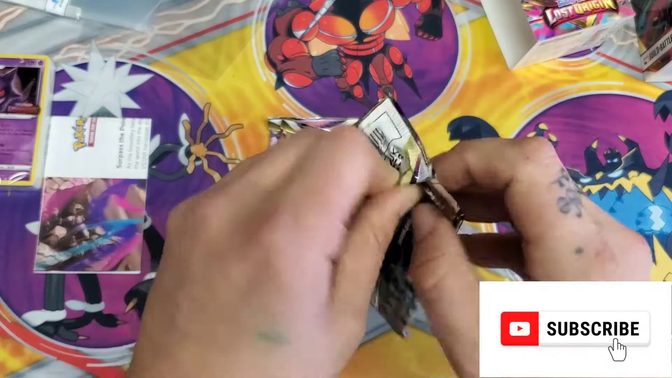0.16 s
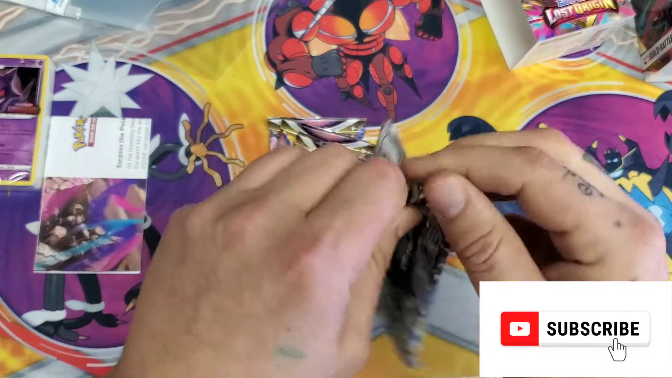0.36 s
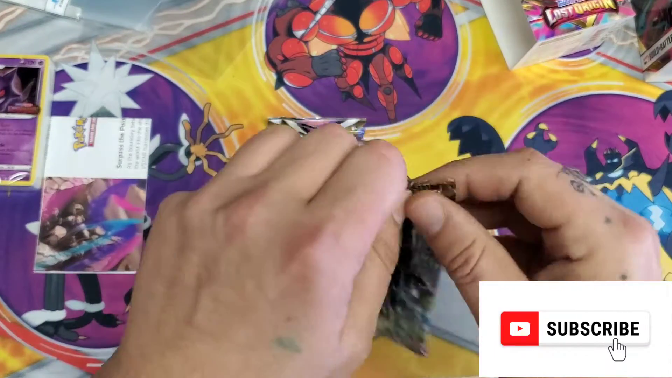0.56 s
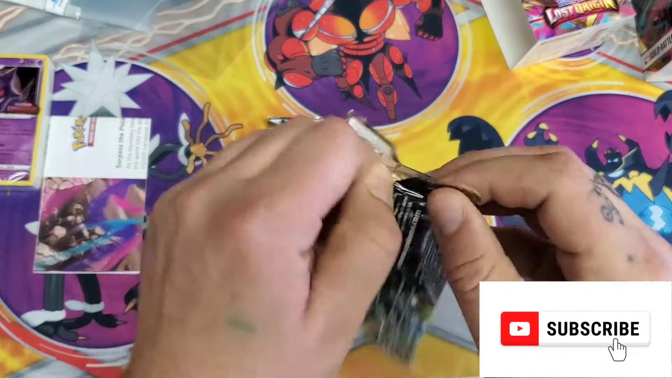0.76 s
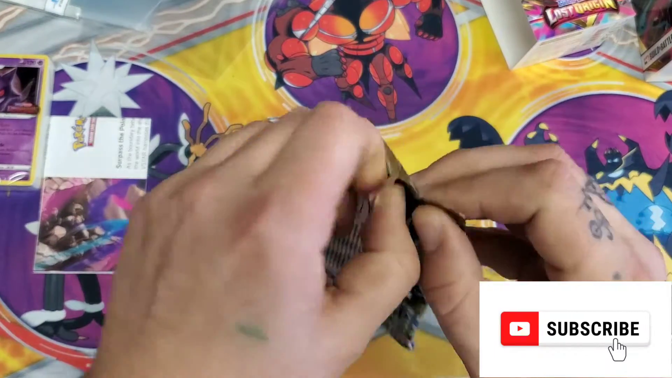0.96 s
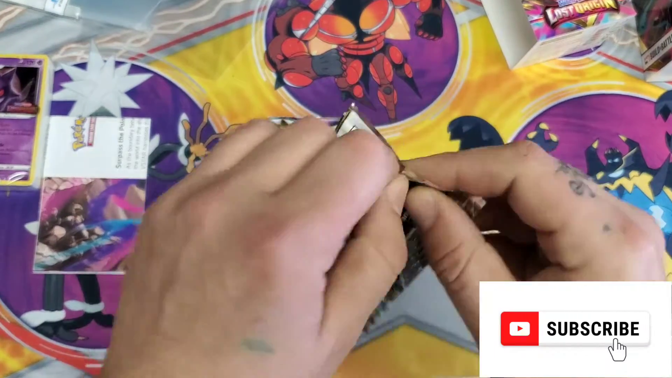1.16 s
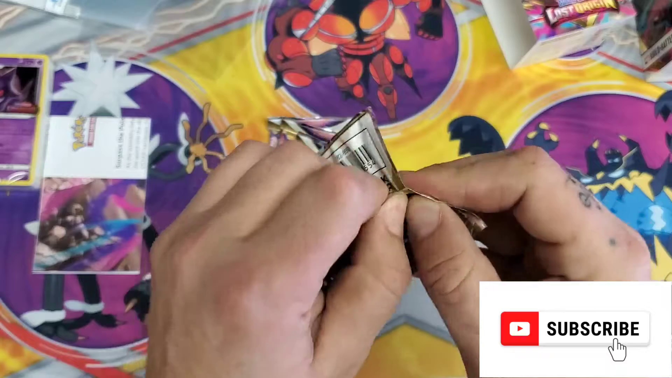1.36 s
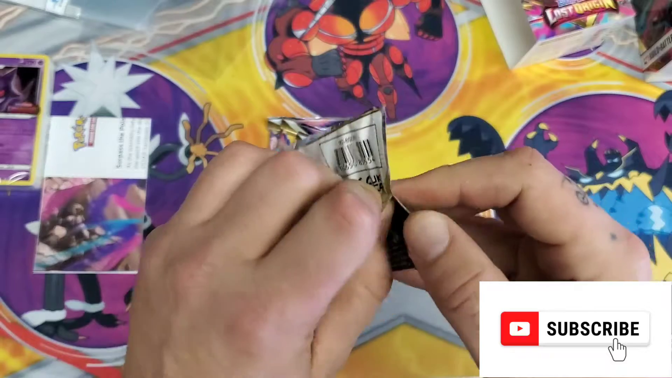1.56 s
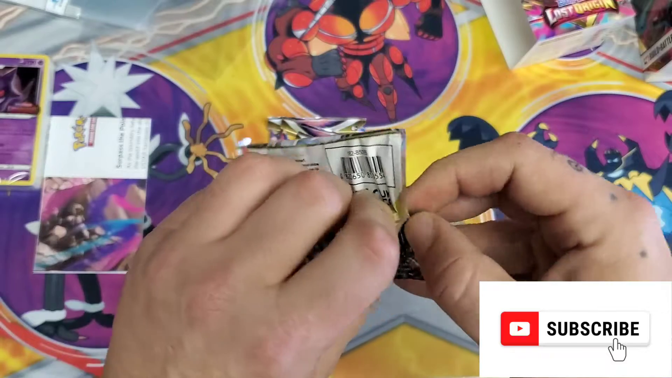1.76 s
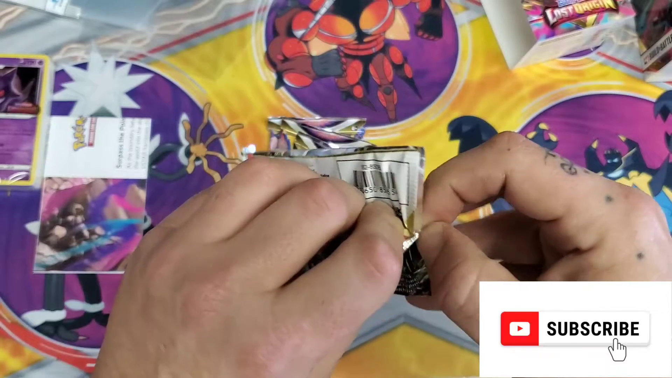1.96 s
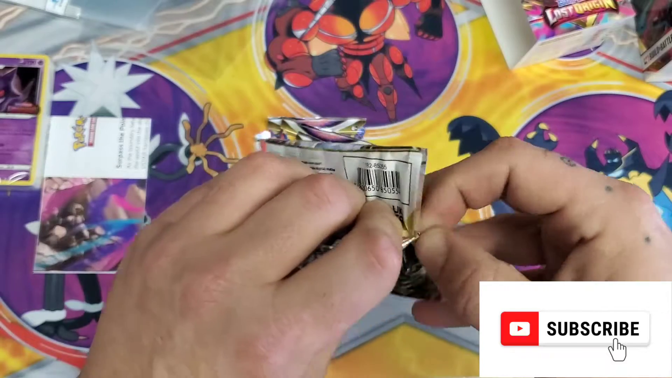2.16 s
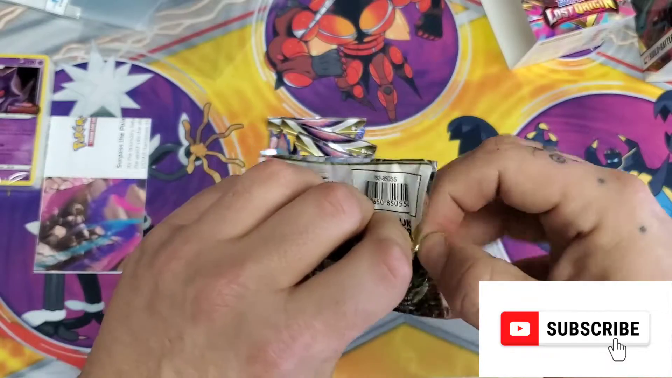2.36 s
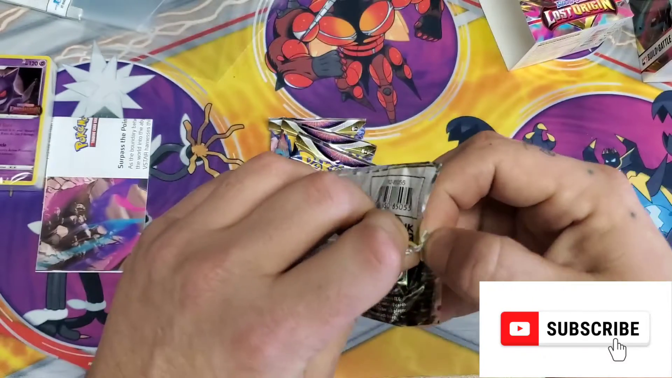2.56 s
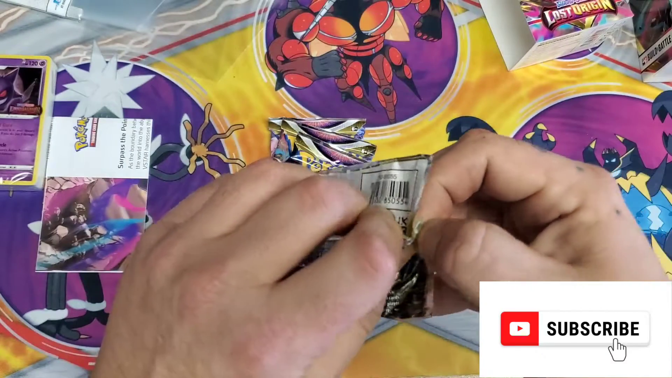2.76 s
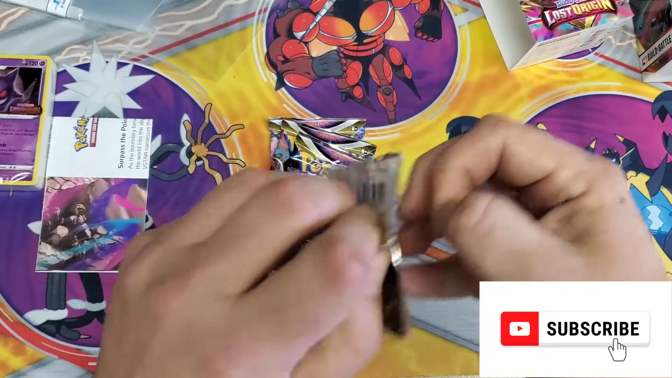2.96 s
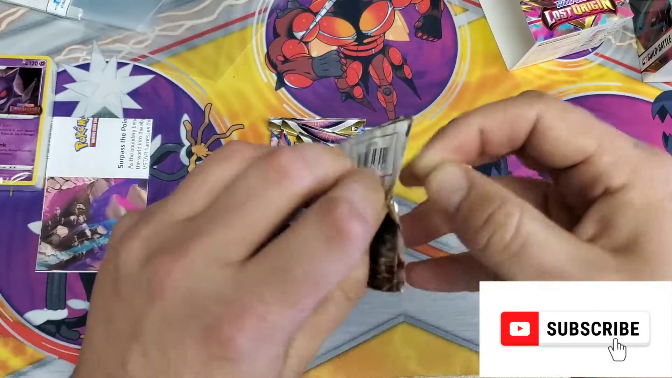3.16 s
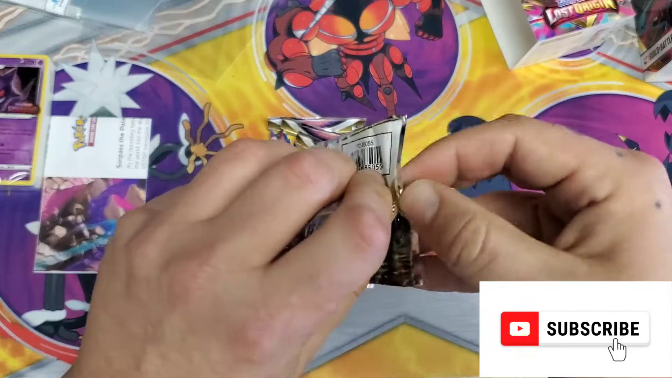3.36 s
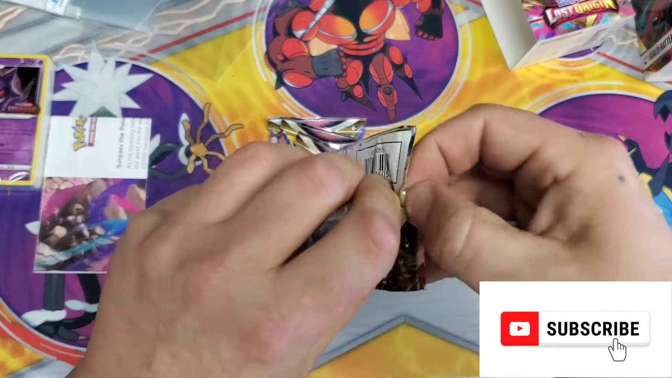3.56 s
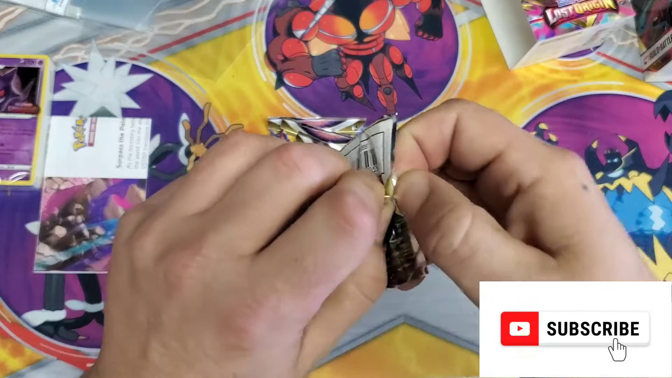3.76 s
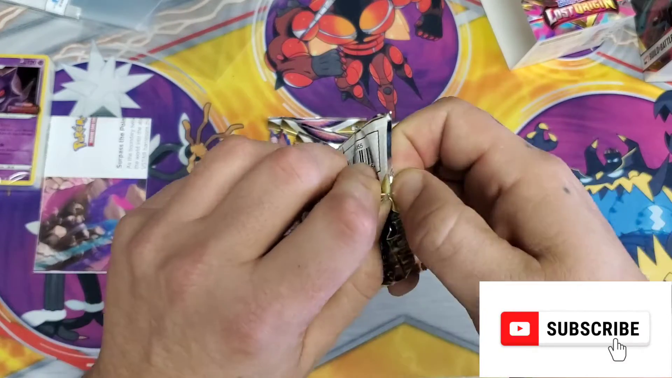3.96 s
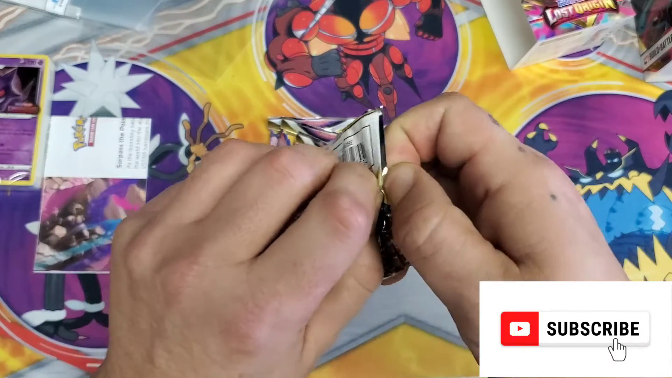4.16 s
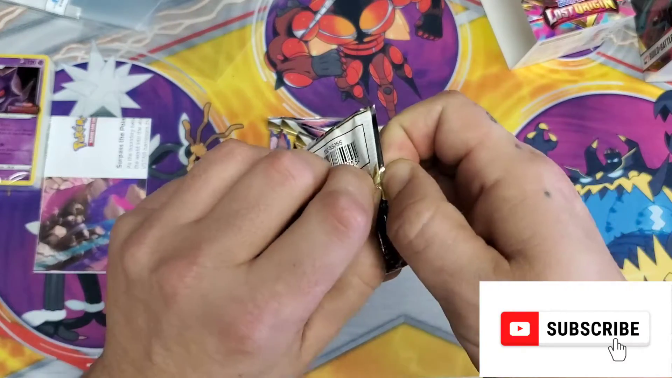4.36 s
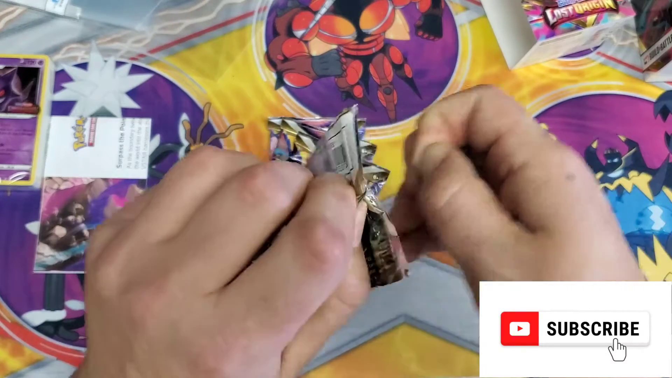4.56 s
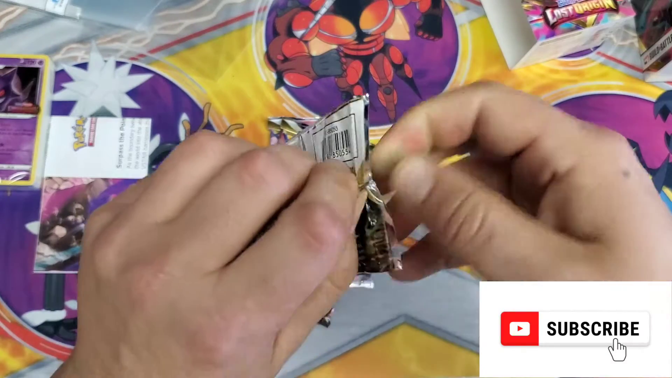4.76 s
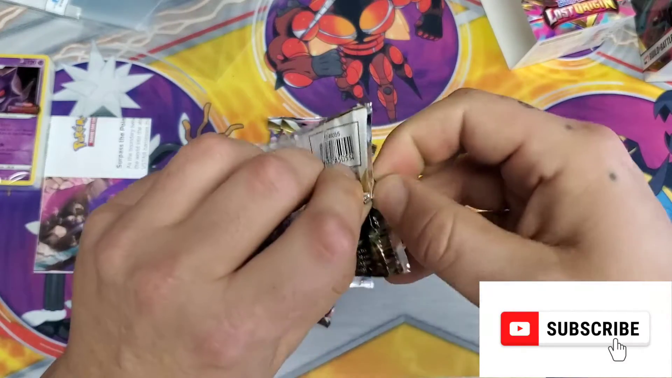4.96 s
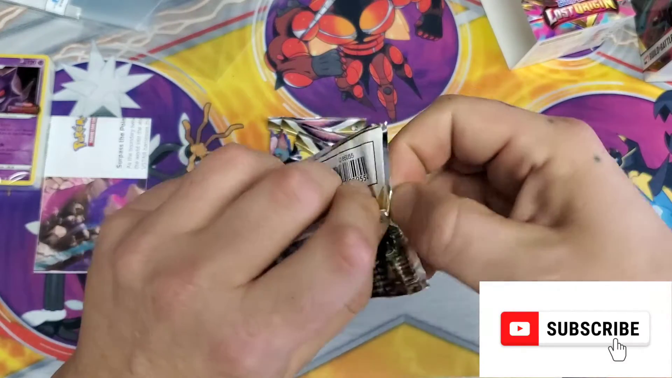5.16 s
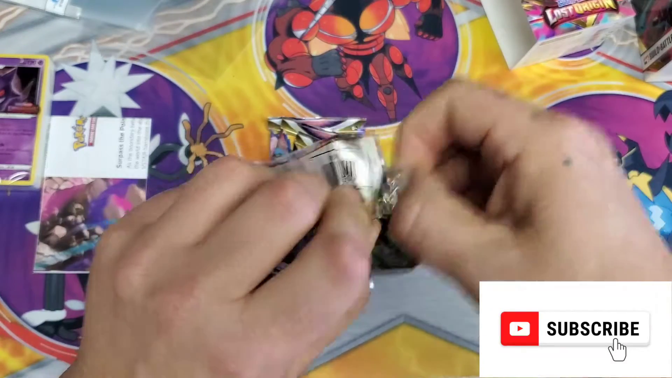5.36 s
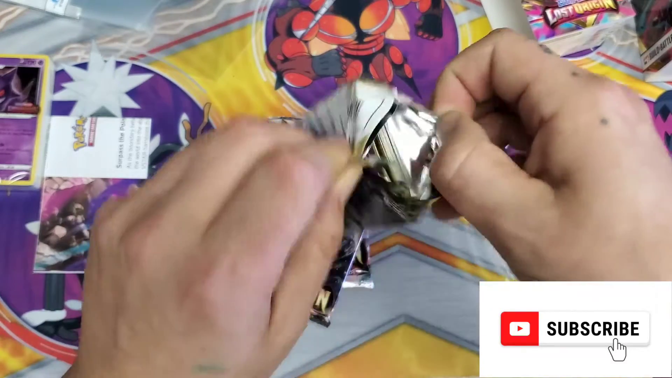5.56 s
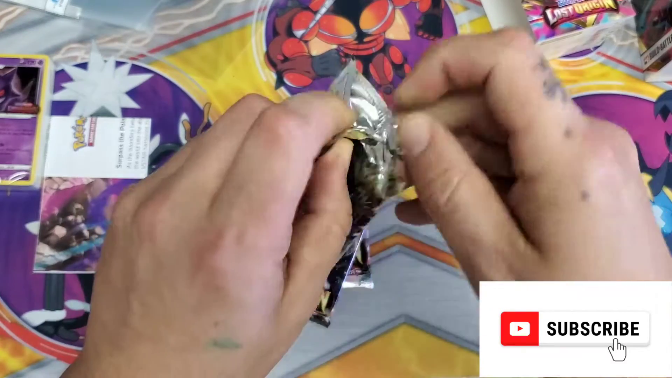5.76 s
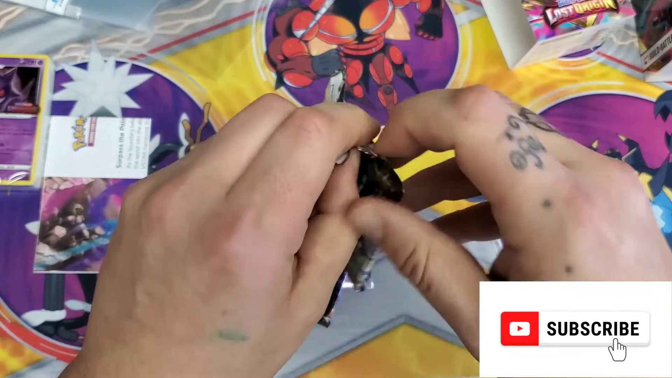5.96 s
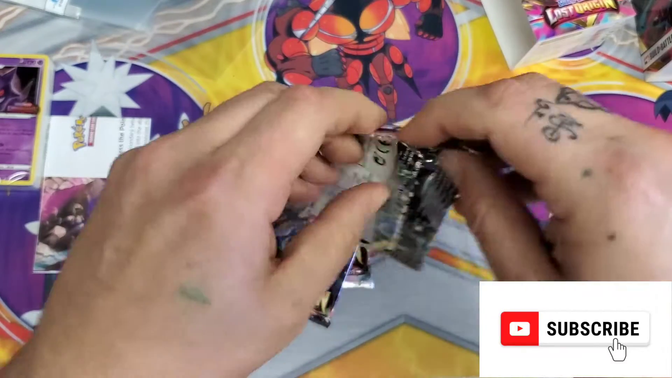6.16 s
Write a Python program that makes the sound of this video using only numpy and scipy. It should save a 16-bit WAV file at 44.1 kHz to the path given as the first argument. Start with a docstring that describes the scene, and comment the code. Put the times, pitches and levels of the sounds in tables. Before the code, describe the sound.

A small foil wrapper crinkles and snaps sharply under busy fingers, easing to sparse ticks before a loud tearing burst near the end.

```python
"""Two hands work a small foil wrapper close to a pair of microphones in a small damped room.
Throughout, a distant induction motor hums (beating sine lines) over rumble and air (filtered noise).
From the start the foil crinkles (random ticks); knocks (two decaying tones), snaps (ring, crack and push)
and running creases or seam tears (dense ticks) soon join, and a hand bumps the table (soft noise thuds).
The foil is busiest in the first second and a half, sparser after that, and bursts out again near 5.4 s."""
import sys
import numpy as np
from scipy import signal
from scipy.fft import rfft, irfft, next_fast_len
from scipy.io import wavfile
from scipy.ndimage import uniform_filter1d, minimum_filter1d

SR = 44100
rng = np.random.default_rng(int(sys.argv[2]) if len(sys.argv) > 2 else 0)


def dump_mix(stems):
    """Bounce the given channels to the path in sys.argv[1] as a 16-bit WAV at rate SR."""
    frames = np.atleast_2d(stems).T  # one column per channel
    limited = np.clip(frames, -1, 1)  # hard clip at full scale
    pcm = np.round(limited * 32767).astype(np.int16)
    wavfile.write(sys.argv[1], SR, pcm)


def gain_from_db(level_db):
    """Convert decibel levels to linear amplitude factors (20 dB per decade)."""
    decades = np.asarray(level_db, float) / 20
    return 10 ** decades


N = 273881
LEFT_RIGHT = np.array([[1], [-1]])   # opposite signs in the two channels


def in_time(rows):
    """Linear interpolation: a (time, value) curve becomes one value per sample."""
    s, values = np.transpose(rows)
    return np.interp(np.arange(N) / SR, s, values)


def at_hz(points, hz):
    """Logarithmic frequency scale: read a (frequency, dB) table between its points."""
    table_hz, db = np.transpose(points)
    return np.interp(np.log(hz + 1), np.log(table_hz), db)


def rms_one(x):
    """Normalisation of power: scale to rms 1."""
    return x / np.sqrt(np.mean(x ** 2) + 1e-20)


def band(x, low_hz, high_hz):
    """Band limitation by a Butterworth band-pass."""
    sos = signal.butter(2, [low_hz, min(high_hz, .45 * SR)], "band", fs=SR, output="sos")
    return signal.sosfilt(sos, x + 1e-18)


def shaped(x, gain):
    """Linear filtering: multiply the spectrum by gain(Hz)."""
    size = next_fast_len(N)
    hz = np.arange(size // 2 + 1) * SR / size
    return irfft(rfft(x, size) * gain(hz), size)[..., :N]


def add(out, s, sound):
    """Superposition: mix a short sound in at time s."""
    i = round(s * SR)
    out[i:i + len(sound)] += sound[:N - i]


# motor lines: mains_multiple, shaft_multiple, level_db (before the common gain), phase_offset_rad (+ left, - right)
HUM_LINES = [(2, 0, -57.5, .05), (4, 0, -62.5, 0.53), (6, 0, -69.5, .15), (8, 0, -77.5, 0.16),
             (0, 2, -64, 0.064), (0, 3, -99.5, .15), (0, 5, -69, 0.28), (0, 16, -77.5, .2),
             (2, 1, -68.5, 0.13), (4, 1, -79, 0.33)]
# spectrum of the room air: frequency_hz, relative_density_db (dB per Hz)
AIR_SPECTRUM = [(15, -29.5), (25, 6), (123, -4), (256, -6.5), (384, -9), (560, -18), (936, -15),
                (1040, -27), (1370, -25), (1700, -20.5), (2840, -45), (5430, -31.5), (7510, -56),
                (14400, -30), (16000, -43)]
# arms shifting on the table top, as low rumble: time_s, level_db
ARM_RUMBLE = [(0.0, -67), (0.67, -52.5), (0.71, -68), (3.11, -56.5), (5.29, -66), (5.38, -58.5),
              (6.21, -62.5)]


def background():
    """Interference: motor lines locked to mains and shaft beat together, over rumble and partly alike air."""
    mains_hz, shaft_hz, in_step_s = 60.01, 58.57, .07
    gain_db, sag_db_per_s, waver_db = 5, 0.69, 2   # common to hum and air, which slowly fade and waver
    air_db = -63   # before the common gain
    t = np.arange(N) / SR - in_step_s
    waver = np.interp(t, np.arange(50) * 0.076, rng.standard_normal(50))   # holds still after 3.8 s
    common_db = gain_db - sag_db_per_s * t + waver_db * waver

    hum = np.zeros((2, N))
    for mains, shaft, db, offset in HUM_LINES:
        line_hz = mains * mains_hz + shaft * shaft_hz
        # standing waves reach the two ports out of step
        phase = shaft * (shaft - 2) + offset * LEFT_RIGHT
        hum += gain_from_db(db - 2) * np.cos(2 * np.pi * line_hz * t + phase)

    mid, side, low = rng.standard_normal((3, N))
    unlike = band(side, 300, 18000) * 0.77 + 0.11 * side
    air = rms_one(shaped(mid + unlike * LEFT_RIGHT, lambda hz: gain_from_db(at_hz(AIR_SPECTRUM, hz))))
    low_mid = band(band(low, 30, 85), 40, 90)
    low_side = 0.31 * band(side, 30, 85)
    rumble = rms_one(low_mid + low_side * LEFT_RIGHT)
    return gain_from_db(common_db) * (hum + gain_from_db(air_db) * air) + gain_from_db(in_time(ARM_RUMBLE)) * rumble


# colour of the crinkle: frequency_hz, relative_density_db (dB per Hz)
FOIL_COLOUR = [(180, -47), (300, -17), (392, -8.5), (470, -12), (634, -35.5), (762, -15), (856, -13),
               (4750, -1), (7570, -5.5), (14500, 3.5), (16000, 19.5)]


def grains(per_s, spread_db, dull_db):
    """Shot noise: tiny random buckles, each a broad tick at its own pitch; dullness lifts the low pitches."""
    sizes = gain_from_db(spread_db * np.minimum(rng.exponential(1, N), 3)) * rng.choice([-1, 1], N)
    clicks = sizes * (rng.random(N) < per_s / SR)
    dealt = rng.integers(0, 10, N)   # which of ten pitches each click takes
    out = 0
    for k, hz in enumerate(np.geomspace(500, 15000, 10)):
        lift_db = dull_db * np.log2(5000 / hz)
        ticks = rms_one(band(clicks * (dealt == k), hz / 1.234, hz * 1.533))
        # the root of the pitch turns level per Hz into level per band
        out = out + gain_from_db(at_hz(FOIL_COLOUR, hz) + lift_db) * ticks * np.sqrt(hz)
    return rms_one(band(out, 320, SR / 2))   # small facets radiate no bass


# how hard the fingers work the foil: time_s, level_db (of the fine crinkle)
FINGER_EFFORT = [(0.0, -55), (0.14, -52), (0.26, -35), (0.53, -51.5), (0.85, -45.5), (1.24, -41.5),
                 (1.4, -57.5), (1.64, -52), (1.8, -59.5), (2.25, -62), (2.4, -57), (2.63, -62), (3.18, -57),
                 (4.08, -73.5), (5.14, -73.5), (5.55, -46.5), (5.86, -52), (6.21, -50.5)]


def crinkle():
    """Crackling noise: foil under the fingers buckles finely all the time, and more as it settles after a snap."""
    dull_db_per_octave, dull_per_db = 1.5, 0.1138   # harder work bends larger facets, which sound duller
    settle_s, settle_db = 0.021, -34.5   # time constant, level under the snap
    level_db = in_time(FINGER_EFFORT)
    dull_db = dull_db_per_octave + dull_per_db * (level_db - level_db.mean())
    kicks = np.zeros(N)
    for s, db, hz, bright_db in CLEAR_SNAPS:
        kicks[round(s * SR)] += gain_from_db(db + settle_db)
    settling = signal.lfilter([1], [1, -np.exp(-1 / (settle_s * SR))], kicks)
    return (gain_from_db(level_db) + settling) * grains(per_s=3000, spread_db=12.5, dull_db=dull_db)


def lesser_snaps(count=400):
    """Poisson process: smaller facets flip at random, their level following the effort of the moment."""
    per_s, over_crinkle_db, spread_db = 30.0, 12.0, 2.5
    gap, size, pitch, bright = rng.random((count, 4)).T
    s = np.cumsum(-np.log(gap + 1e-9) / per_s)
    effort_db = np.interp(s, *np.transpose(FINGER_EFFORT))
    db = effort_db + over_crinkle_db - spread_db * np.log(size + 0.15)
    rows = zip(s, db, 2500 * 2.7 ** pitch, 3.14 * bright - 6.5)
    return [row for row in rows if row[0] < N / SR]


# hollow knocks of the pack: start_s, level_db, upper_tone_share (0-1)
PACK_KNOCKS = [(0.032, -35, 0.67), (0.42, -30.5, 0.24), (0.431, -33, 0.6), (0.449, -46, 0.3),
               (0.697, -38, 0.83), (0.774, -47, 1), (0.954, -40, 0.5), (1.143, -37, .9),
               (2.985, -34.5, 0.4), (4.547, -44, 0), (5.412, -27, 0.93), (5.434, -20, 1), (5.455, -34, 0.9),
               (5.525, -43.5, .95), (5.689, -41, 0.73), (5.86, -40, 0.06)]
# the two hollow tones of the pack: lower_hz, upper_hz
PACK_TONES = (444, 764)


def knocks():
    """Cavity resonance: squeezed or tapped, the air in the pack rings briefly; fingers scuff around each tone."""
    cycles = 4.75   # for a tone to fall to about a third
    t, out = np.arange(4000) / SR, np.zeros(N)
    noises = rng.standard_normal((len(PACK_KNOCKS), len(t)))
    for (s, db, upper), noise in zip(PACK_KNOCKS, noises):
        upper = np.clip(upper, 0, 1)
        for hz, share in zip(PACK_TONES, (1 - upper, upper)):
            swell = 1 - np.exp(-t / 0.0012)
            ring = np.sin(2 * np.pi * hz * t) * swell * np.exp(-t * hz / cycles)
            scuff = band(noise * np.exp(-t / 0.0096), hz / 1.62, hz * 1.9)
            add(out, s, gain_from_db(db) * share * (ring + gain_from_db(3.0) * scuff))
    return out


# the clear snaps of the foil: start_s, level_db, pitch_hz (of the ring), crack_over_ring_db (before fixed shares)
CLEAR_SNAPS = [(0.0328, -22.5, 1810, -24), (0.0454, -42.5, 6300, -33), (0.084, -27, 4950, -7),
               (0.091, -10, 6520, -16), (0.1083, -14, 6600, -10), (0.1431, -10.5, 4700, -26),
               (0.1541, -9.5, 6690, -28), (0.187, -10, 4800, -13), (0.2202, -24.5, 2660, -16),
               (0.2312, -20.5, 3040, -8), (0.2606, -15, 4730, -7.5), (0.2757, -20, 4740, -11),
               (0.3152, -15.5, 5370, -11), (0.345, -15.5, 2570, -7), (0.3535, -12.5, 2480, -12),
               (0.3757, -22, 5090, -13.5), (0.4319, -8, 5450, -13), (0.4942, -5.5, 4750, -11),
               (0.602, -10, 5540, -17), (0.623, -23, 3220, -7), (0.631, -14, 5310, -16),
               (0.6504, -26, 3100, -7), (0.6606, -25.5, 3110, -6), (0.6853, -17.5, 3100, -12),
               (0.6985, -20, 2000, -7.5), (0.7296, -2, 2970, -17), (0.7502, -10.5, 5950, -15),
               (0.767, -10.5, 3050, -18), (0.7734, -5, 5630, -24), (0.7954, -4, 4810, -22),
               (0.821, -7.5, 4600, -16), (0.844, -12.5, 6600, -8), (0.9034, -17, 3070, -9.5),
               (0.9393, -9.5, 7020, -13), (0.9504, -18.5, 3900, -8), (0.9692, -20, 6640, -16),
               (0.9844, -14.5, 5590, -11), (0.9938, -24, 6600, -1), (1.0074, -25, 4500, -5),
               (1.033, -28, 3150, -41), (1.0728, -18, 3200, -24), (1.0941, -8, 5100, -14),
               (1.1205, -4.5, 4040, -6.5), (1.1443, -11, 4570, -19.5), (1.1718, -19.5, 3700, -17),
               (1.1892, -12.5, 6720, -10), (1.2218, -19, 2720, -14.5), (1.23, -24, 2000, -10),
               (1.259, -29, 2060, -18), (1.2816, -23, 3000, -15), (1.3071, -15.5, 5050, -16),
               (1.3219, -22, 6080, -12), (1.3322, -28, 4750, -6), (1.3982, -32, 5000, -4),
               (1.407, -6, 6640, -14.5), (1.551, -34, 3000, -9), (1.5814, -16, 7200, -20),
               (1.5955, -13.5, 6600, -14), (1.6114, -20.5, 2340, -10.5), (1.6216, -24, 4630, -8),
               (1.6592, -11.5, 2490, -10), (1.727, -36, 3260, -5), (1.7521, -15.5, 6300, -13.5),
               (1.7762, -32, 6890, -4), (1.7994, -25.5, 6670, -5), (1.8538, -13.5, 5250, -15.5),
               (1.8907, -28, 5100, -6), (1.93, -26, 1980, -6.5), (1.9675, -28.5, 6780, -2),
               (1.9778, -11.5, 2520, -10), (2.0256, -22, 3630, -14), (2.0479, -23, 3650, -19),
               (2.061, -21.5, 6700, -10.5), (2.156, -34.5, 6890, -5), (2.18, -35, 5540, -1),
               (2.2003, -20.5, 3810, -8), (2.2216, -23.5, 6900, -14), (2.2626, -11.5, 6060, -18),
               (2.311, -19.5, 5960, -6.5), (2.361, -26.5, 6460, -6), (2.3996, -24.5, 5600, -13),
               (2.4526, -25, 2900, -13), (2.4776, -12.5, 5000, -16), (2.5356, -20, 6940, 0.5),
               (2.6083, -31.5, 6100, -3.5), (2.6648, -32.5, 6600, -37), (2.8192, -23.5, 6600, 1.5),
               (2.9482, -33.5, 5730, -11), (2.9663, -30, 5500, -8), (2.9807, -9, 2620, -15),
               (3.0067, -17, 4600, -5), (3.0364, -24, 2220, -10), (3.0768, -21, 5500, -11.5),
               (3.0903, -21.5, 3200, -38), (3.1717, -30.5, 3350, -39), (3.1991, -18.5, 6210, -10.5),
               (3.2878, -20.5, 3950, -6), (3.3578, -23, 2100, -22), (3.3628, -18, 7060, -18.5),
               (3.3827, -19.5, 4700, -15.5), (3.4254, -29, 6340, -26), (3.493, -18.5, 4700, -25.5),
               (3.6292, -32.5, 2000, -23), (3.6541, -32.5, 2090, -9), (3.681, -25.5, 7200, -15.5),
               (3.7316, -31.5, 6700, -3), (3.7538, -29.5, 7500, -4.5), (3.803, -24, 6860, -9.5),
               (3.9742, -40.5, 2030, -7), (4.147, -14.5, 5300, -11.5), (4.158, -17.5, 5000, -14),
               (4.2048, -32.5, 5000, -10), (4.2485, -45.5, 6400, -5), (4.3294, -31.5, 7160, -4),
               (4.4803, -52.5, 6860, -1), (4.5286, -30.5, 7000, -10), (4.5484, -20, 2230, -5.5),
               (4.6124, -22.5, 3900, -14), (4.7057, -26, 4020, -13.5), (4.8468, -22.5, 6500, -10),
               (4.936, -35, 2570, -12), (5.1492, -23, 6900, -8), (5.2386, -31, 5560, -9.5),
               (5.28, -36, 5980, -17), (5.3285, -18.5, 5460, -10), (5.3797, -24, 7340, -18),
               (5.3916, -19, 2100, -18), (5.405, -8, 4600, -8), (5.4174, -6, 4150, -11),
               (5.4562, -12, 2650, -18), (5.5082, -13, 4430, -30), (5.552, -42, 3900, -17),
               (5.56, -7.5, 2620, -24), (5.5752, -14, 2420, -24), (5.5829, -6, 3720, -27),
               (5.631, -37, 3960, -11), (5.6656, -10.5, 5900, -10), (5.7336, -14, 3130, -33),
               (5.7607, -21.5, 4290, -24), (5.777, -26, 3610, -11), (5.7959, -21, 3470, -30.5),
               (5.8482, -23.5, 3800, -10), (5.9938, -35, 6670, -16), (6.0312, -22, 2380, -11),
               (6.0498, -20.5, 5600, -7), (6.0814, -12.5, 5700, -13.5), (6.168, -25, 4440, -25)]


def snaps():
    """Snap-through buckling: a facet flips with a ring of a few cycles, a brief bright crack and a low push."""
    ring_db, crack_db, push_db = -7.0, -1.5, -29.5   # shares of a snap's level
    t = np.arange(400) / SR
    rings, cracks, pushes = np.zeros((3, N))
    every = list(CLEAR_SNAPS) + lesser_snaps()
    noises = rng.standard_normal((len(every), len(t)))
    for (s, db, hz, bright_db), noise in zip(every, noises):
        burst = rms_one(noise * np.exp(-t / 0.00067))
        ring = np.sin(2 * np.pi * hz * t) * np.exp(-t * hz / 2.47) * np.sign(noise[0])
        size_db = 2.7 * np.log2(4000 / hz)   # big facets ring low and push more air
        add(rings, s, gain_from_db(db + ring_db) * (ring + gain_from_db(-16.0) * burst))
        add(cracks, s, gain_from_db(db + crack_db + bright_db) * burst)
        add(pushes, s, gain_from_db(db + push_db + size_db) * burst)
    return band(rings, 1860, 10660) + band(cracks, 5670, 20000) + band(pushes, 367, 1300)


# long creases and the seam ripping: start_s, length_s, level_db, dullness_db_per_octave
CREASES_AND_RIPS = [(0.137, 0.037, -41, -4), (0.352, 0.026, -31, 2), (0.617, 0.038, -35.5, 1),
                    (0.753, 0.029, -26, 2), (0.955, 0.02, -27.5, 3), (1.073, 0.042, -35, 4),
                    (2.184, 0.062, -37.5, -1), (2.483, 0.016, -36.5, 0), (2.844, 0.06, -39.5, -3.5),
                    (2.975, 0.015, -22.5, 3.5), (3.042, 0.019, -47.5, 9), (3.199, 0.031, -40.5, 3.5),
                    (3.606, 0.0615, -60, 8.5), (5.556, 0.037, -32, 3.5), (4.542, 0.0334, -30.5, 2),
                    (4.576, 0.046, -40.5, 4), (5.388, 0.058, -21.5, 3.5), (5.483, 0.026, -41.5, 1.5),
                    (5.857, 0.026, -47, 6), (5.937, 0.026, -46, 4), (6.027, 0.089, -42.5, 3.5),
                    (6.16, 0.029, -43, 6.5)]


def runs():
    """Avalanche of buckling: a crease travels or the seam lets go in a dense rush; bright snaps start bright ones."""
    after_db, after_s = -23.0, .009   # each snap sets a crease running: level under the snap, length
    dull_db, level = np.zeros((2, N))
    every = [(s, after_s, db + after_db, -2.5 - 0.25 * bright_db) for s, db, hz, bright_db in CLEAR_SNAPS]
    every += list(CREASES_AND_RIPS)
    spans = [slice(round(s * SR), round((s + length) * SR)) for s, length, db, dull in every]
    for on, (s, length, db, dull) in zip(spans, every):
        dull_db[on] = dull
    rush = grains(per_s=4000, spread_db=6.5, dull_db=dull_db)
    for on, (s, length, db, dull) in zip(spans, every):
        local_rms = np.sqrt(np.mean(rush[on] ** 2))
        level[on] = np.maximum(level[on], gain_from_db(db) / local_rms)
    return uniform_filter1d(level, size=90) * rush   # 2 ms edges


# a hand meets the table: start_s, level_db, decay_s (time constant)
TABLE_BUMPS = [(0.416, -37.5, 0.036), (2.985, -45, 0.023), (5.86, -47, 0.024)]


def bumps():
    """Damped impact: a soft, toneless thud of band-limited noise that dies exponentially."""
    t, out = np.arange(8000) / SR, np.zeros(N)
    noises = rng.standard_normal((len(TABLE_BUMPS), len(t)))
    for (s, db, decay_s), noise in zip(TABLE_BUMPS, noises):
        envelope = (1 - np.exp(-t / 0.0037)) * np.exp(-t / decay_s)
        add(out, s, gain_from_db(db) * rms_one(band(noise, 140, 800)) * envelope)
    return out


# level of the left port over the right: frequency_hz, difference_db
LEFT_EXCESS = [(300, 0.5), (2000, 3), (6000, -2), (10000, 2.5), (15000, 6.5)]


def two_ports(x, lag_s, pan_db):
    """Interaural-style differences: the left port faces the hands, so its top is stronger and a little earlier."""
    side = LEFT_RIGHT / 2
    hz = np.arange(len(x) // 2 + 1) * SR / len(x)
    level = gain_from_db(side * (at_hz(LEFT_EXCESS, hz) + pan_db))
    delay = np.exp(2j * np.pi * hz * side * lag_s)
    return irfft(rfft(x) * level * delay, len(x))


# decay of the room by band: centre_hz, t60_s, level_db (before a left-right tilt), left_right_likeness (0-1)
ROOM_DECAY = [(288, 0.25, -5, 1), (790, 0.15, -7, 0.6), (1900, 0.15, -4, 0.18), (4950, 0.1, -1.5, 0.152),
              (9050, 0.17, -15, 0.09), (13700, 0.11, -7, .1)]
# echoes of table and hands: delay_s (nominal, varied at random), level_db (before the same tilt)
NEAR_ECHOES = [(.0027, -7.5), (.0055, -25), (.01, -37.5)]


def room_tail():
    """Reverberation: for one position of the hands, a few near echoes and noise that dies band by band."""
    t = np.arange(int(.4 * SR)) / SR
    tail = np.zeros((2, len(t)))
    for hz, t60, db, alike in ROOM_DECAY:
        noise = rng.standard_normal((2, len(t)))
        mid, side = band(noise, hz / 1.53, hz * 1.335) * gain_from_db(-60 * t / t60)
        alike = np.clip(alike, 0, 1)
        both = np.sqrt(1 + alike) * mid + np.sqrt(1 - alike) * side * LEFT_RIGHT
        tail += gain_from_db(db) * both * np.sqrt(10 / t60 / SR)
    for late, db in NEAR_ECHOES:
        at = round(late * SR * rng.uniform(0.76, 1.1))
        tail[0, at] += gain_from_db(db)
        tail[1, at + rng.integers(0, 6)] += gain_from_db(db)
    return tail


def room(x, count=70):
    """Direct and reverberant fields: the hands keep moving, so each short stretch has its own direction and paths."""
    right_lag_s, lag_spread_s, pan_spread_db = 3.6e-5, 2.5e-5, 0.36
    out, edges = np.zeros((2, N)), np.linspace(0, N, count + 1).astype(int)
    for a, b in zip(edges, edges[1:]):
        shift, turn = rng.standard_normal(2)
        lag_s = right_lag_s + lag_spread_s * shift
        direct = two_ports(np.pad(x[a:b], (0, 256)), lag_s, pan_db=pan_spread_db * turn)
        out[:, a:b + 128] += direct[:, :b - a + 128][:, :N - a]
        wet = signal.fftconvolve(x[None, a:b], room_tail(), axes=1)[:, :N - a]
        out[:, a:a + wet.shape[1]] += gain_from_db(2.2 * LEFT_RIGHT) * wet   # stronger on the left
    return out


def scene():
    """Superposition: wrapper and hands near the microphones in their room, plus the background."""
    return room(snaps() + crinkle() + runs() + knocks() + bumps()) + background()


def band_limit(x):
    """A steep low-pass at the top of the band."""
    return signal.sosfilt(signal.butter(12, 17140, fs=SR, output="sos"), x)


def record(dry):
    """Gain control and filtering: a fast limiter holds the sharpest snaps, then bass and top are cut."""
    headroom = np.minimum(1, .8 / (np.abs(dry).max(axis=0) + 1e-9))
    held = dry * uniform_filter1d(minimum_filter1d(headroom, size=90), size=45)   # 2 ms hold, 1 ms smoothing
    bass_cut = signal.sosfilt(signal.butter(3, 29, "high", fs=SR, output="sos"), held)
    top_cut = signal.sosfilt(signal.cheby2(14, 80, 16800, fs=SR, output="sos"), bass_cut)
    return band_limit(top_cut)


dry = scene()
out = record(dry)
dump_mix(out)
```